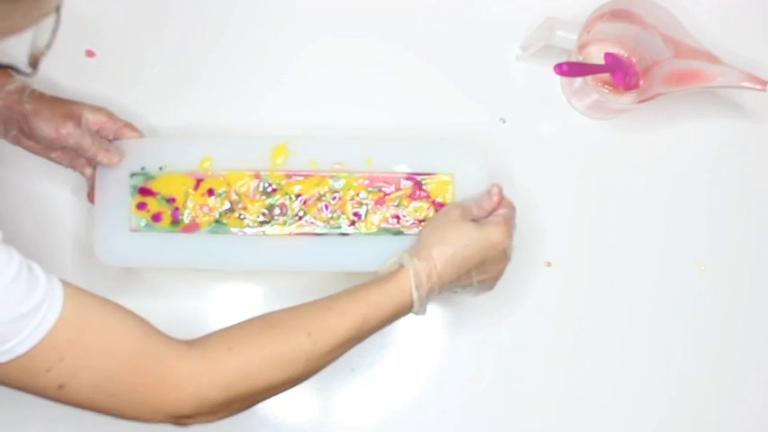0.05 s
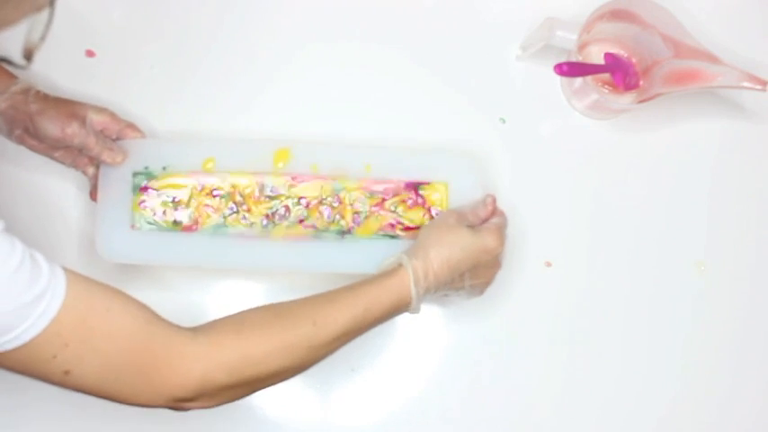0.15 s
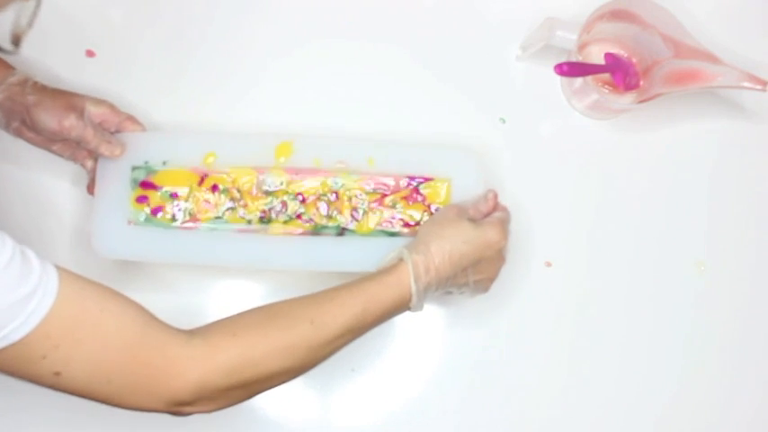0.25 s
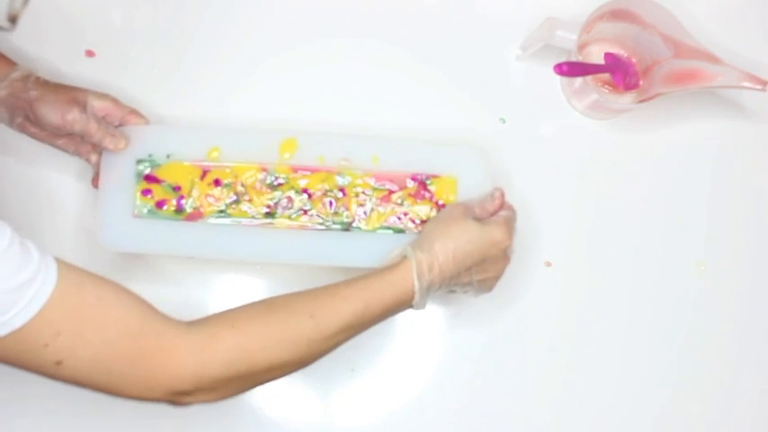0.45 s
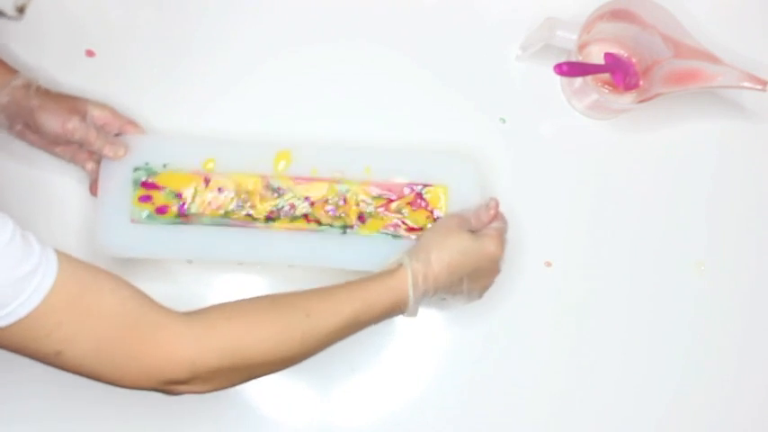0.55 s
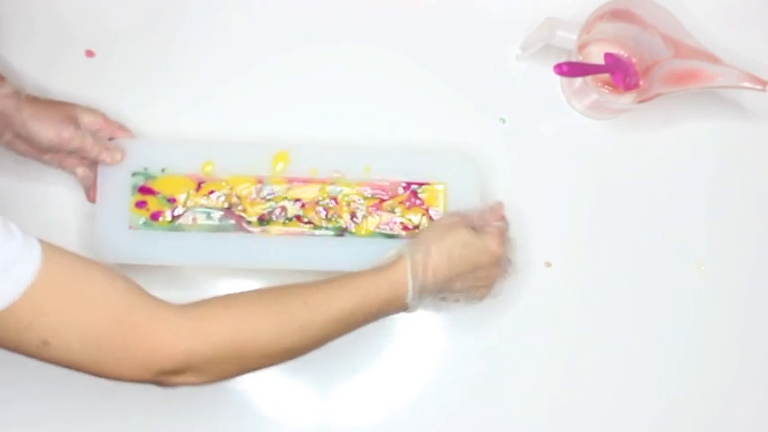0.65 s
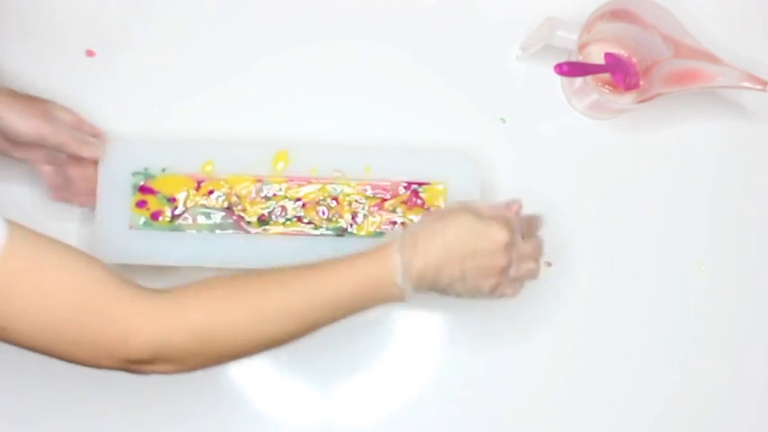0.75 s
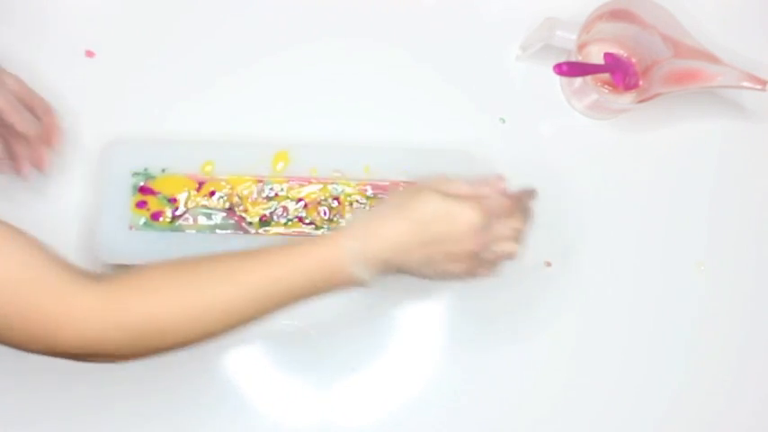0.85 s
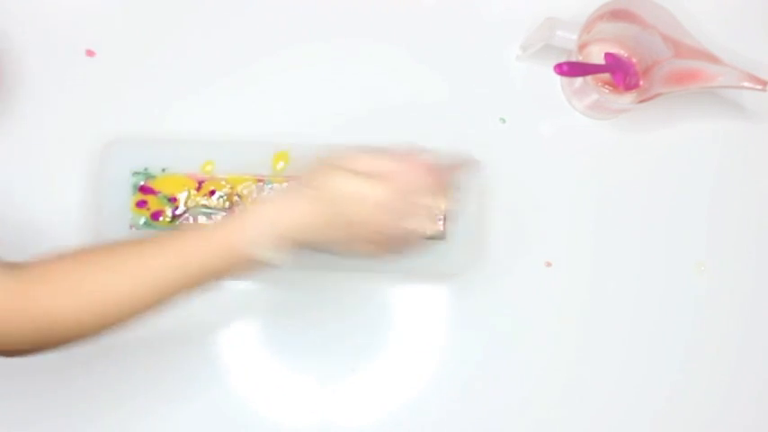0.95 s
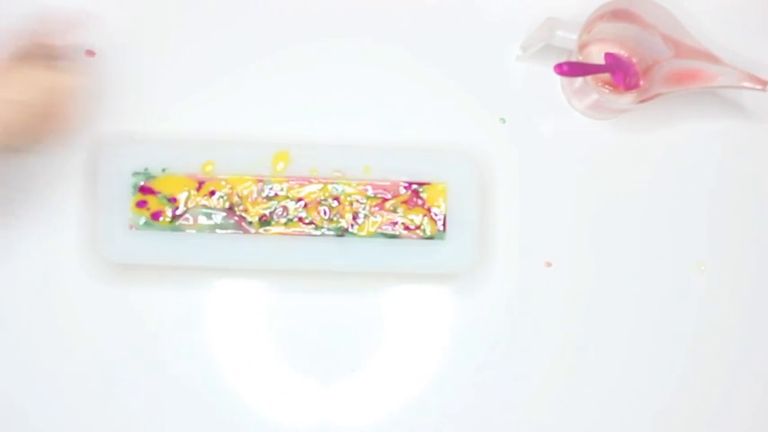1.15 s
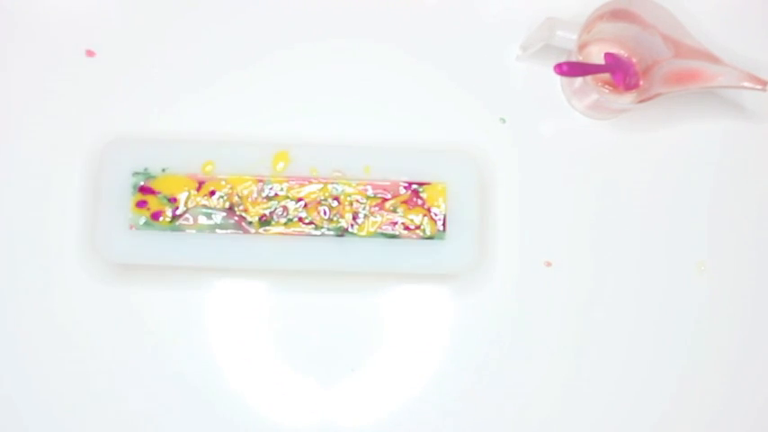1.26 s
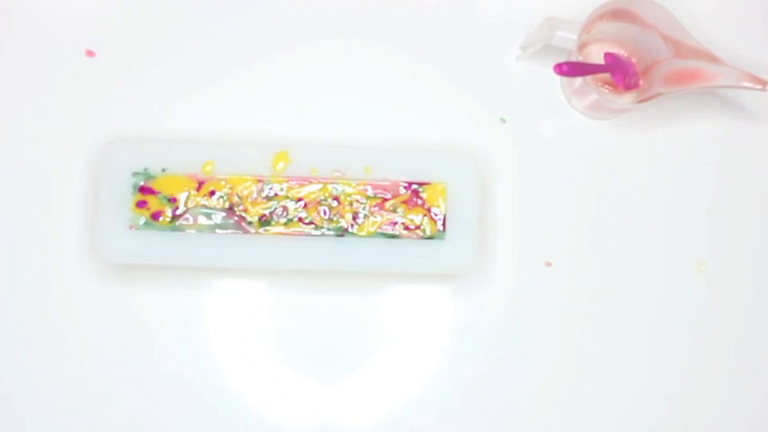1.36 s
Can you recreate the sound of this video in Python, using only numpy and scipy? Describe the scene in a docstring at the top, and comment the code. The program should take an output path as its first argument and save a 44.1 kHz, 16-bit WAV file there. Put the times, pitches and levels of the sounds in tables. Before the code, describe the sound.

One sharp knock of a heavy soft mould on a tabletop, followed by a dull, wobbly set-down.

```python
"""A filled silicone mould is dropped on a table top: one hard knock, then a soft, wobbling set-down.
Every contact excites the damped modes of table and mould, and a noise burst slaps from the flat underside.
The room answers for most of a second by convolution with decaying noise; an earlier knock still dies away.
Gloves rustle as random crackles and tick once near the end, over filtered noise for room air and hiss."""
import sys
import numpy as np
from scipy import signal
from scipy.fft import rfft, irfft
from scipy.io import wavfile

SR = 44100
rng = np.random.default_rng(int(sys.argv[2]) if len(sys.argv) > 2 else 0)


def materialize(psi):
    """Save the field psi as 16-bit PCM at rate SR to the path in sys.argv[1].

    A 1-D psi becomes a single channel; in a 2-D psi each row is a channel.
    """
    bounded = np.clip(np.atleast_2d(psi).T, -1, 1)
    quanta = np.round(bounded * 32767).astype(np.int16)
    wavfile.write(sys.argv[1], SR, quanta)


def nominal_scale(level):
    """Amplitude ratio for a level in decibels (scalar or array-like)."""
    x = np.asarray(level, float) / 20
    return 10 ** x


N = 61739   # length [samples]
LEAD = SR // 2   # time computed ahead of the start, so that the earlier knock can ring on [samples]
SIDES = np.array([[1], [-1]])   # signs of left and right


def rms_one(x):
    """Normalization: equal mean power, so that a level in dB can be set afterwards."""
    return x / np.sqrt(np.mean(x ** 2) + 1e-20)


def at_hz(points, hz):
    """Logarithmic frequency scale: straight-line interpolation of a table over log frequency."""
    table_hz, value = np.transpose(points)
    return np.interp(np.log(hz), np.log(table_hz), value)


def ring(x, hz, t60):
    """Damped resonance: a two-pole filter answers a unit click with a decaying sine of height 1."""
    radius = nominal_scale(-60 / (t60 * SR))   # decay per sample
    angle = 2 * np.pi * hz / SR
    return signal.lfilter([0, np.sin(angle)], [1, -2 * radius * np.cos(angle), radius ** 2], x + 1e-18)


def bands(size, alike, shape):
    """Interchannel correlation: half-octave noise bands mix a common and an opposed part; gain is shape(hz)."""
    band_edges = 22 * 2 ** np.arange(0, 9.6, .5)   # [Hz]
    settle = 4000   # filter onset that is thrown away [samples]
    white = rng.standard_normal((2, 2, size + settle))
    out = 0
    for k, (low, high) in enumerate(zip(band_edges, band_edges[1:])):
        band_pass = signal.butter(2, [low, high], "band", fs=SR, output="sos")
        # neighbouring bands take turns with two independent noises
        mid, side = signal.sosfilt(band_pass, white[k % 2])[:, settle:]
        hz = np.sqrt(low * high)
        likeness = np.clip(at_hz(alike, hz), -1, 1)
        stereo = np.sqrt(1 + likeness) * mid + np.sqrt(1 - likeness) * side * SIDES
        out = out + shape(hz) * stereo
    return out


def knocks():
    """Impact excitation: a harder contact gives a brighter click; returns the stereo sound and the clicks."""
    # contacts of mould and table:
    # (time [s], level [dB], contact sharpness [Hz], slap t60 [s], left-right level difference [dB])
    contacts = [(-0.14, -11.5, 2200, .03, 1), (0.2014, -18, 1780, 0.072, 2.5),
                (0.2064, -3.5, 9700, 0.012, 6), (0.2101, -16.5, 1550, 0.048, -27),
                (0.2148, -16.5, 1230, 0.052, 2.5), (0.224, -26, 1230, 0.12, 18.5),
                (0.293, -35, 1090, 0.066, -11), (0.340, -25.5, 900, 0.12, 11),
                (0.425, -30, 1090, 0.023, 2.5), (0.5784, -19, 796, 0.061, 7.5),
                (0.588, -22, 700, 0.088, -6.5), (0.591, -32.5, 1190, .05, 25.5),
                (0.5993, -22, 1130, 0.071, 6), (0.615, -24, 510, 0.14, 5), (0.648, -20.5, 197, 0.11, 7),
                (0.668, -25.5, 200, 0.12, 7), (1.040, -42, 1300, 0.067, 10), (1.365, -41, 900, 0.059, 0)]
    sound = np.zeros((2, N + LEAD + SR))
    clicks = np.zeros(N + LEAD + SR)
    impulse = -1.0 * (np.arange(SR) == 0) + 1e-18
    for s, db, sharp_hz, slap_t60, pan_db in contacts:
        sharp_hz = min(sharp_hz, .45 * SR)
        click = signal.lfilter(*signal.butter(2, sharp_hz, fs=SR), impulse)
        contact = np.tile(table_modes(click), (2, 1))
        contact[:, :SR // 8] += slap(sharp_hz, slap_t60)
        i = int(s * SR) + LEAD
        sound[:, i:i + SR] += nominal_scale(db + pan_db / 2 * SIDES) * contact
        clicks[i:i + SR] += nominal_scale(db) * click
    return sound[:, :N + LEAD], clicks[:N + LEAD]


def table_modes(click):
    """Modal superposition: the response of table top and mould is a sum of damped resonances."""
    # modes of table top and mould: (frequency [Hz], level before scatter [dB], t60 [s])
    modes = [(46.8, -38, 0.78), (62.5, -26, 0.49), (76.1, -28, 0.8), (103.7, -27.5, 0.53),
             (135, -31.5, 0.1), (219.5, -30, 0.19), (242.3, -19.5, 0.043), (326.5, -17, .045),
             (424, -23.5, 0.37), (660.4, -10, 0.053), (1112, -19, 0.078), (1426, -2, 0.02),
             (2490, -12, 0.021), (3840, -5, 0.0096), (5820, -15.5, 0.011), (7340, -19.5, 0.024),
             (9200, -16.5, 0.018)]
    scatter_db = 1.5   # standard deviation of the mode levels from contact to contact
    swell_share = 0.028   # a mode spreads through the table in this share of its ring time
    t = np.arange(SR) / SR
    scatter = scatter_db * rng.standard_normal(len(modes))
    out = np.zeros(SR)
    for k, (hz, db, t60) in enumerate(modes):
        swell = 1 - np.exp(-t / (swell_share * t60))
        sign = (-1) ** k   # neighbouring modes start in opposite phase
        out += sign * nominal_scale(db + scatter[k]) * ring(click, hz, t60) * swell
    return out


def slap(sharp_hz, t60):
    """Broadband impact radiation: the flat underside lands as a coloured, exponentially decaying noise burst."""
    # spectrum of the slap ahead of its low-pass: (frequency [Hz], relative density [dB per Hz])
    slap_colour = [(47, -61), (80, -7), (287, -7), (521, -5.5), (649, -9.5), (1310, -7.5), (1470, -3.5),
                   (1950, -12), (2330, -8), (3240, -18), (3870, -12.5), (6710, -20), (9340, -19),
                   (15500, -33)]
    slap_db, rise_s = -4.0, 0.00013
    unlike = .3   # amplitude of the opposed left-right part relative to the common part
    size = SR // 8
    t = np.arange(size) / SR
    gain = nominal_scale(at_hz(slap_colour, np.fft.rfftfreq(size, 1 / SR) + 1))
    mid, side = rms_one(irfft(rfft(rng.standard_normal((2, size))) * gain, size))
    burst = signal.lfilter(*signal.butter(1, sharp_hz, fs=SR), mid + unlike * side * SIDES)
    return burst * nominal_scale(slap_db - 60 * t / t60) * (1 - np.exp(-t / rise_s))


def room(clicks):
    """Reverberation: dense reflections are noise that builds up, later in the bass, and decays band by band."""
    # reverberation time: (frequency [Hz], t60 [s])
    room_t60 = [(60, 0.5), (160, 0.38), (420, 0.77), (1100, 0.86), (2900, 0.91), (7700, 0.62),
                (14000, 0.16)]
    # relative colour of the reflections: (frequency [Hz], level [dB])
    room_colour = [(40, 17), (80, 28.5), (160, 14), (420, 12), (1100, 12), (1700, 6), (2900, -2),
                   (7700, -4.5), (14000, -15)]
    # likeness of the two channels: (frequency [Hz], correlation [-1 to 1])
    room_alike = [(60, 0.62), (240, 0.57), (950, -0.19), (3770, 0.17), (15000, -0.59)]
    room_db, pan_db = 12, 3.5   # level, left-right level difference
    build_s, bass_build_cycles = 0.0054, 4.8   # build-up time: a fixed part plus a number of periods
    t = np.arange(SR) / SR

    def envelope(hz):
        """Exponential decay after a gradual build-up of reflection density."""
        decay = nominal_scale(at_hz(room_colour, hz) - 60 * t / at_hz(room_t60, hz))
        build_up = 1 - np.exp(-(t / (build_s + bass_build_cycles / hz)) ** 2)
        return decay * build_up

    echo = bands(SR, room_alike, envelope)
    echo = echo / np.sqrt(np.sum(echo ** 2) / 2)   # unit energy per channel on average
    wet = signal.fftconvolve(clicks[None], echo, axes=1)[:, :len(clicks)]
    return nominal_scale(room_db + pan_db / 2 * SIDES) * wet


def gloves():
    """Random impulse process: thin plastic rubs as dense tiny crackles, and one fold snaps as a damped sine."""
    # rubbing: (time [s], level [dB])
    rustle = [(1.2, -63), (1.232, -82), (1.266, -54), (1.36, -48.5), (1.38, -39.5), (1.4, -46)]
    # spectrum of the crackles: (frequency [Hz], relative density [dB per Hz])
    rustle_colour = [(120, -38), (200, -6), (1050, -6.5), (1570, -8.5), (3870, -10.5), (11200, -13.5),
                     (15000, -29)]
    crackles_per_s, pan_db = 18000, 5   # mean rate in each channel, left-right level difference [dB]
    snap_s, snap_db, snap_hz, snap_t60 = 1.378, -21.5, 2200, 0.0018   # times in s
    s, db = np.transpose(rustle)
    loudness = nominal_scale(np.interp(np.arange(N) / SR, s, db, left=-120))
    grains = rng.standard_normal((2, N)) * (rng.random(N) < crackles_per_s / SR)
    gain = nominal_scale(at_hz(rustle_colour, np.fft.rfftfreq(N, 1 / SR) + 1))
    rub = rms_one(irfft(rfft(grains) * gain, N)) * loudness
    snap = np.zeros(N)
    snap[int(snap_s * SR)] = -nominal_scale(snap_db)
    return (rub + ring(snap, snap_hz, snap_t60)) * nominal_scale(pan_db / 2 * SIDES)


def air():
    """Stationary random noise: room air and microphone hiss have a fixed spectrum and a steady level."""
    # spectrum: (frequency [Hz], relative density [dB per Hz])
    air_colour = [(15, -36), (25, 1), (144, -11), (179, -2.5), (307, -6.5), (449, -6.5), (1590, -10),
                  (1780, -21), (2090, -14), (15800, -20.5)]
    # likeness of the two channels: (frequency [Hz], correlation [-1 to 1])
    air_alike = [(60, 0.73), (240, 0.14), (950, 0.36), (3770, 0.057), (15000, 0.02)]
    # stereo balance: (frequency [Hz], left-right level difference [dB])
    air_balance = [(60, 1.5), (240, 4.5), (950, 4.5), (3770, 0), (15000, 0.0)]
    air_db = -48.5   # rms over both channels

    def gain(hz):
        """Spectral shaping: the gain of one band in each channel."""
        return nominal_scale(at_hz(air_colour, hz) + at_hz(air_balance, hz) / 2 * SIDES)

    return nominal_scale(air_db) * rms_one(bands(N, air_alike, gain))


def scene():
    """Linear superposition: direct knocks, their reverberation, gloves and air add up."""
    direct, clicks = knocks()
    impact = (direct + room(clicks))[:, LEAD:]
    return impact + gloves() + air()


def top_cut(x):
    """Nothing passes above the cut-off."""
    return signal.sosfilt(signal.butter(12, 16970, fs=SR, output="sos"), x)


def record(dry):
    """Saturation and band-limiting: a tanh curve rounds the peaks, a steep low-pass cuts the top."""
    ceiling, cut_hz = .95, 16400   # ceiling as a share of full scale
    rounded = ceiling * np.tanh(dry / ceiling)
    low_pass = signal.cheby2(12, 60, cut_hz, fs=SR, output="sos")
    mix = signal.sosfilt(low_pass, rounded)
    return top_cut(mix)


dry = scene()
out = record(dry)
materialize(out)
```